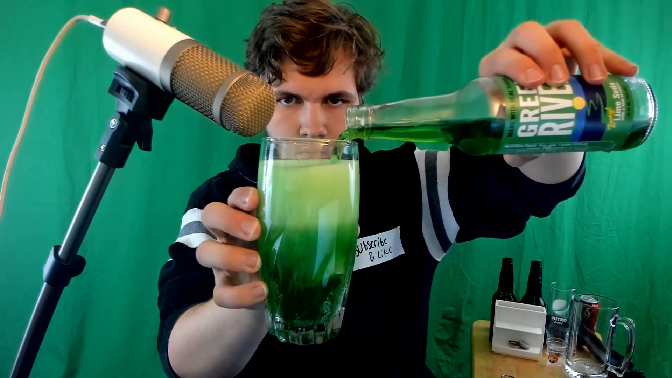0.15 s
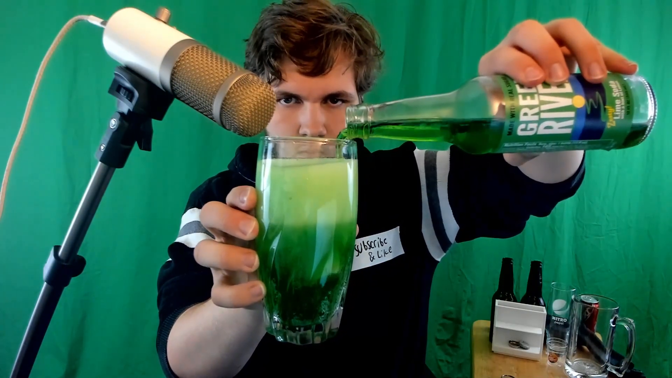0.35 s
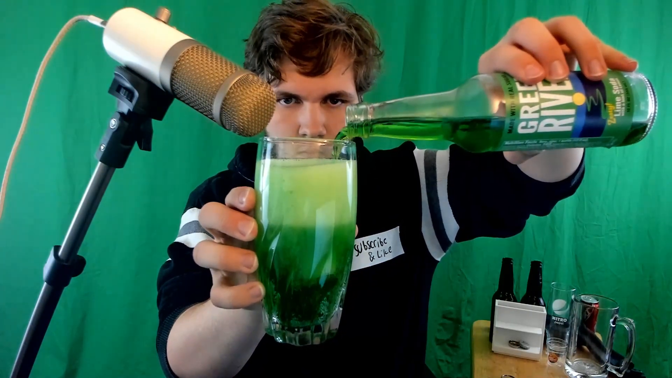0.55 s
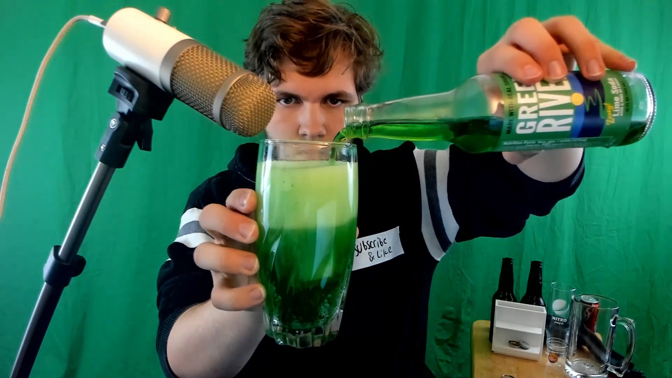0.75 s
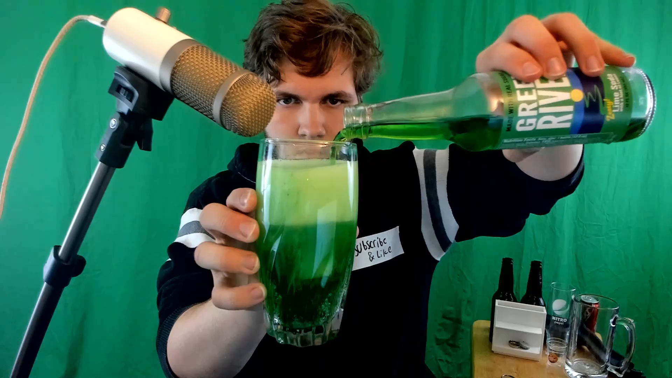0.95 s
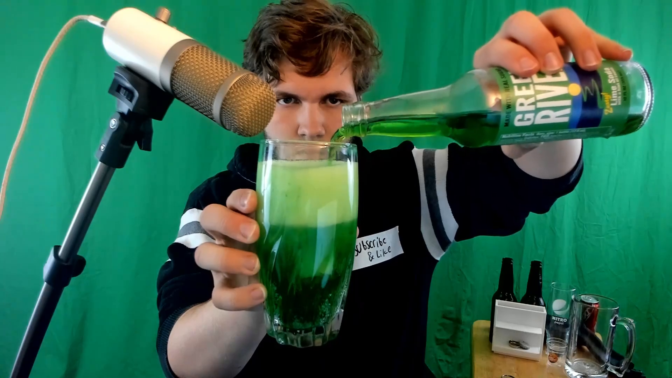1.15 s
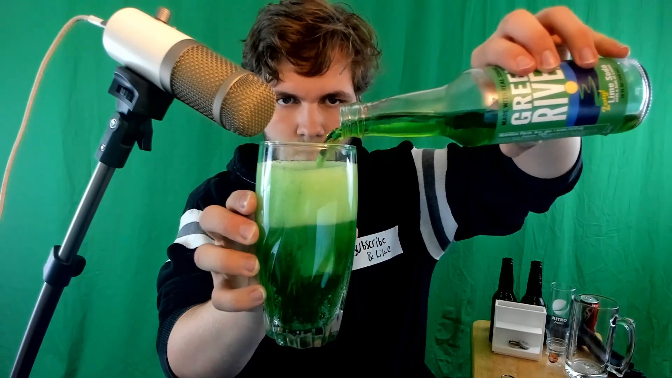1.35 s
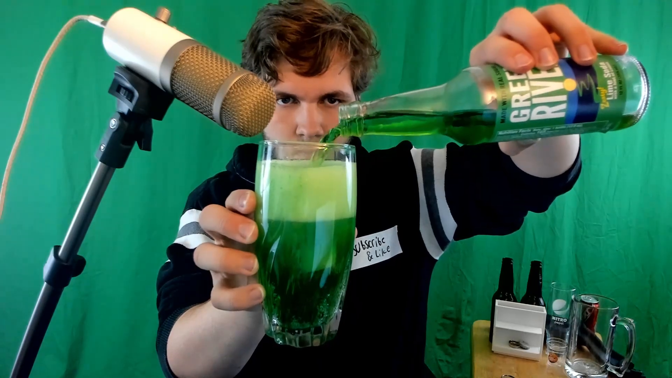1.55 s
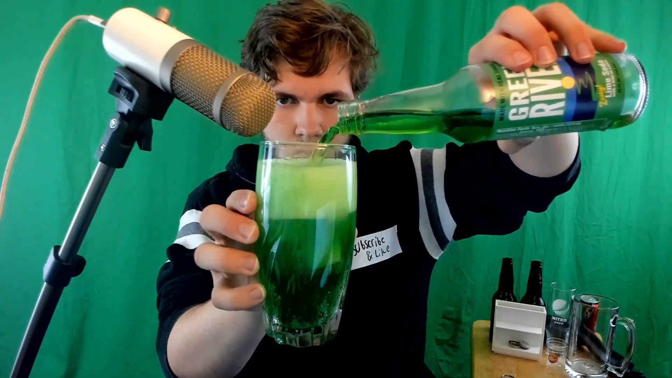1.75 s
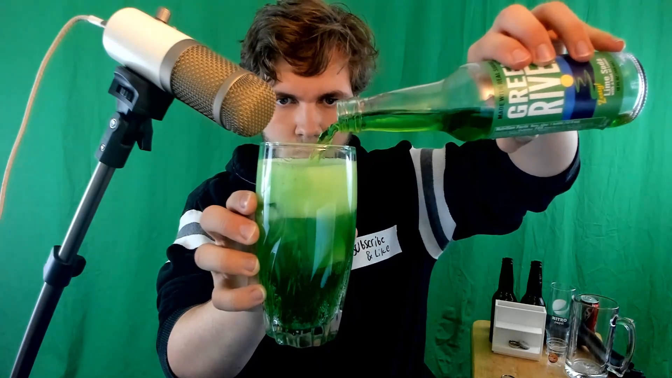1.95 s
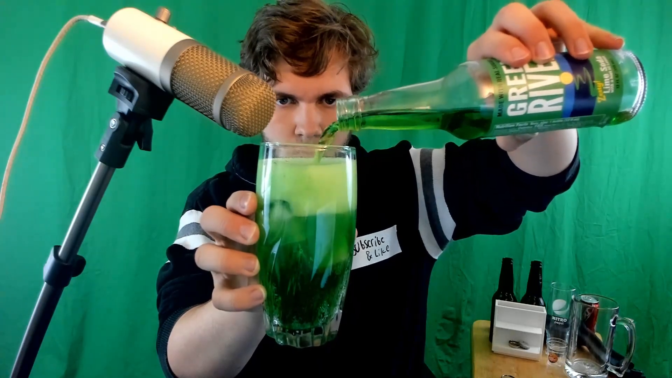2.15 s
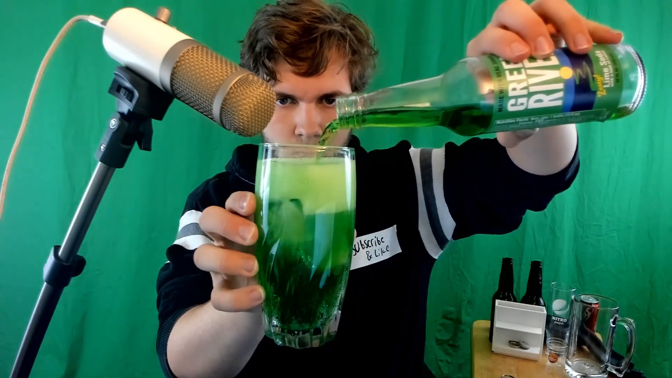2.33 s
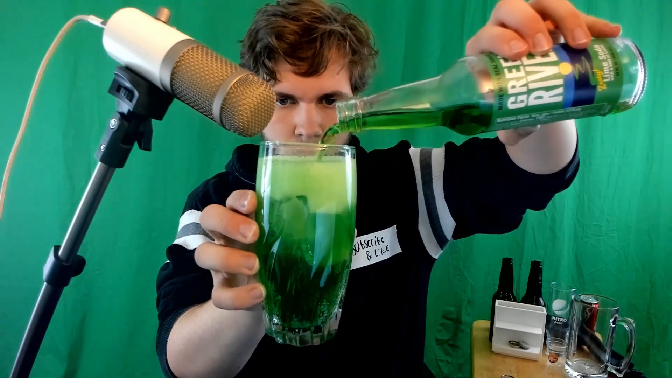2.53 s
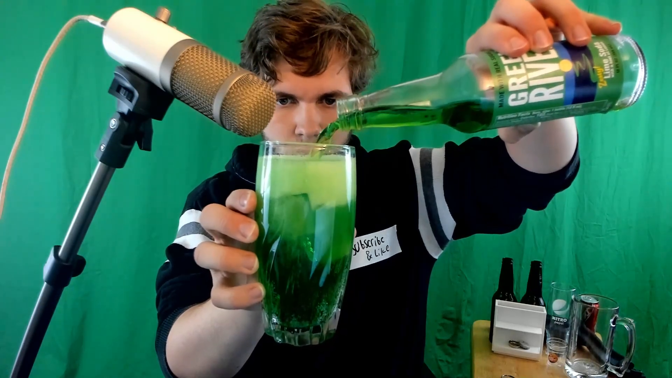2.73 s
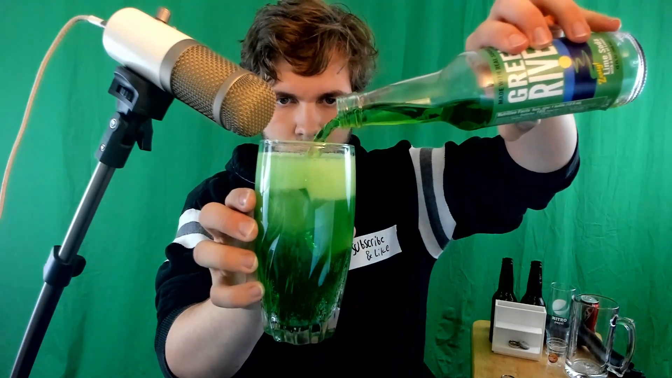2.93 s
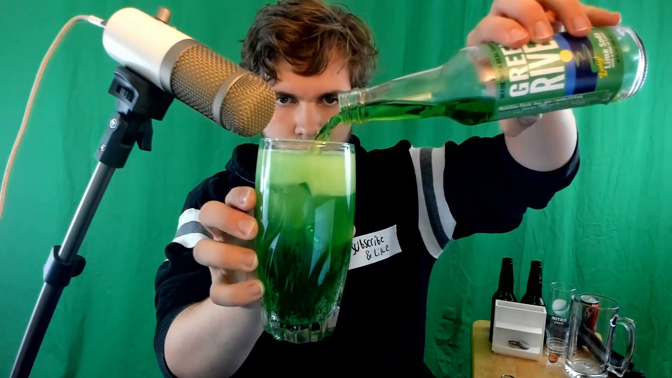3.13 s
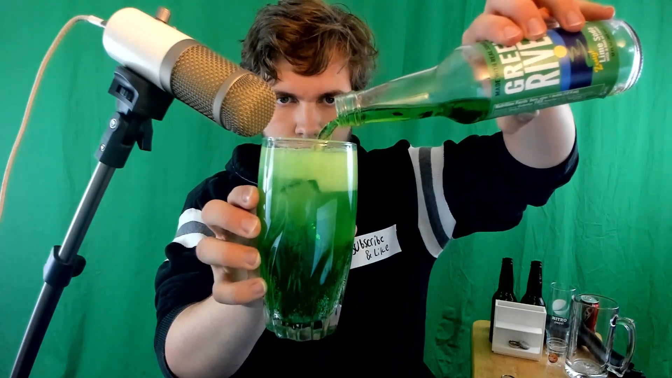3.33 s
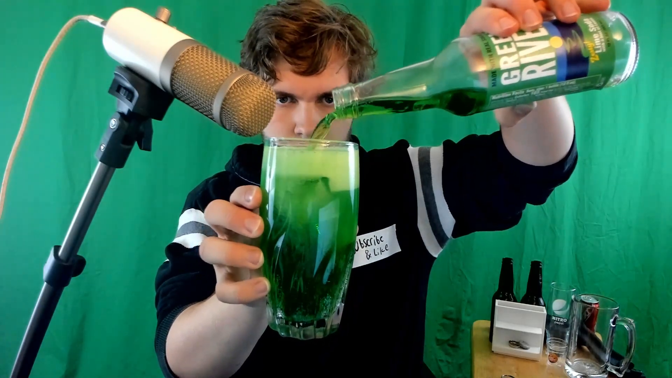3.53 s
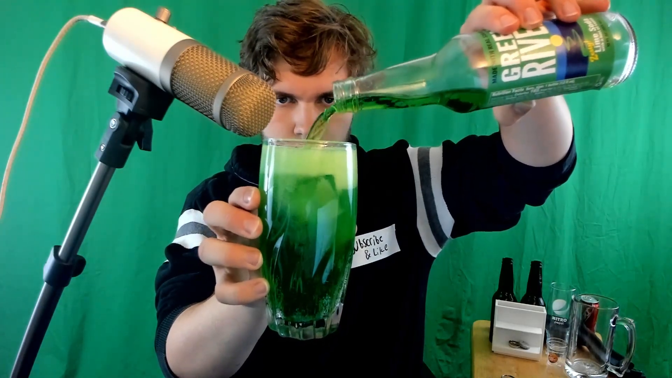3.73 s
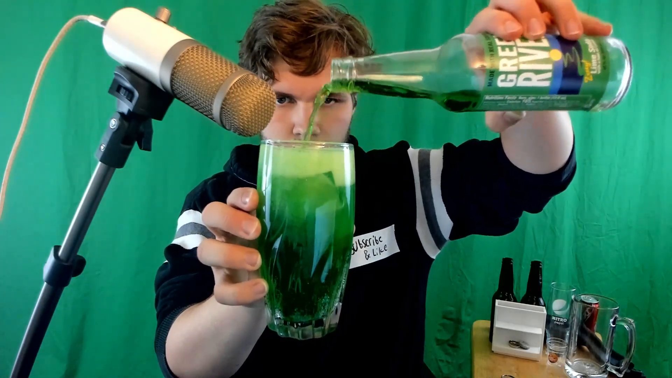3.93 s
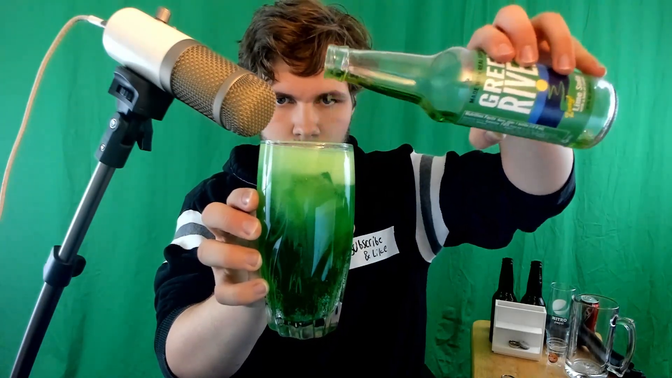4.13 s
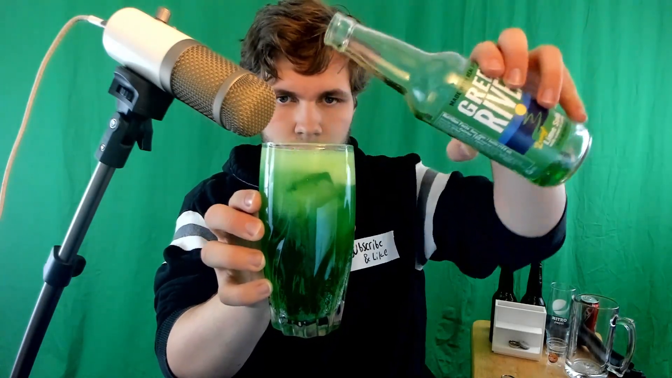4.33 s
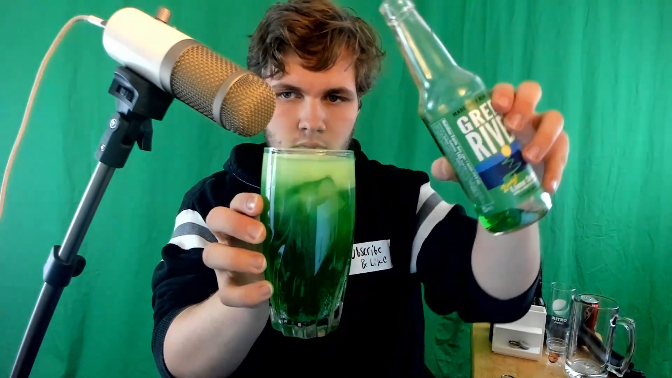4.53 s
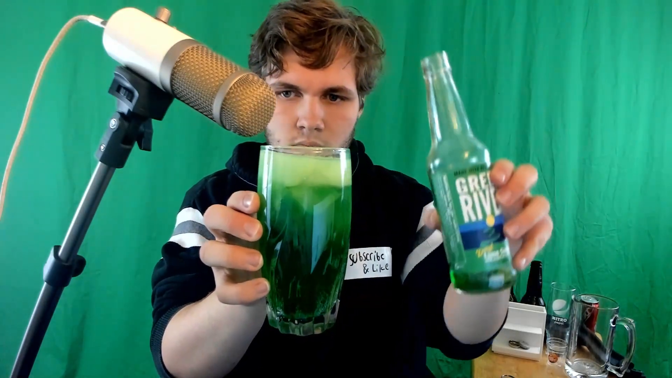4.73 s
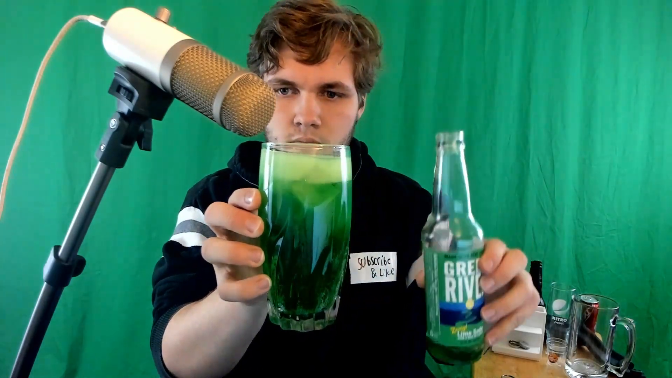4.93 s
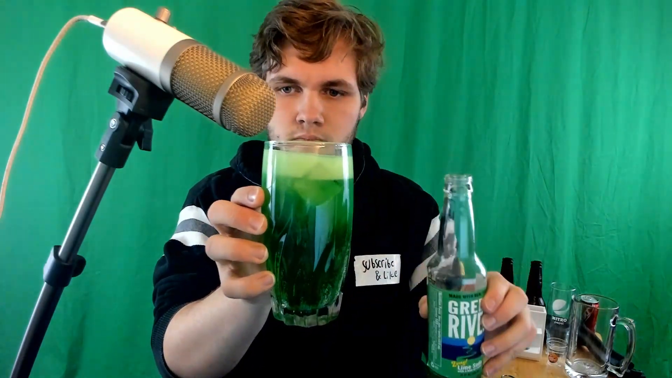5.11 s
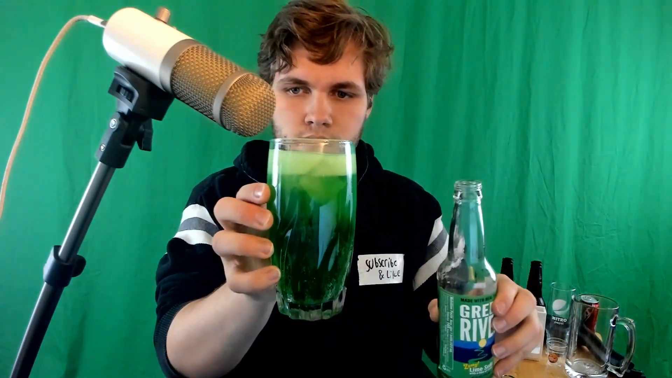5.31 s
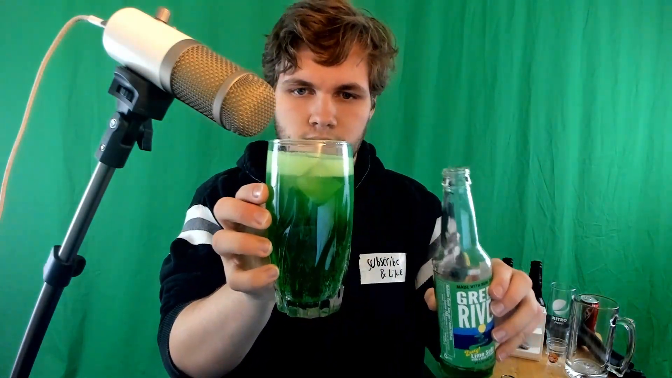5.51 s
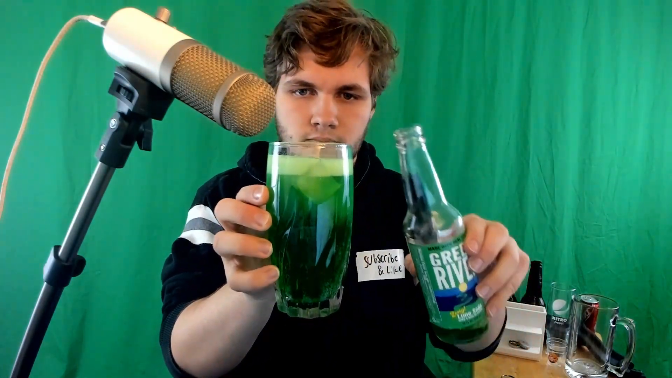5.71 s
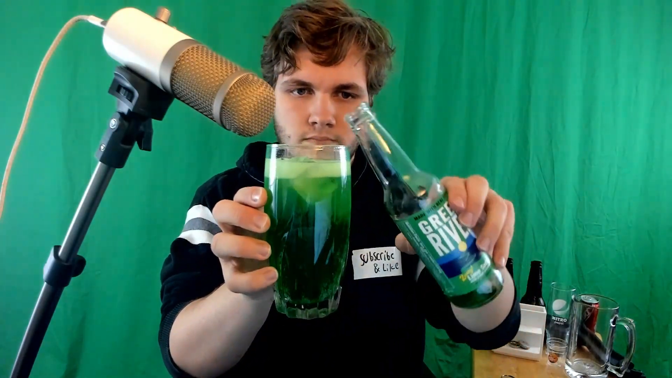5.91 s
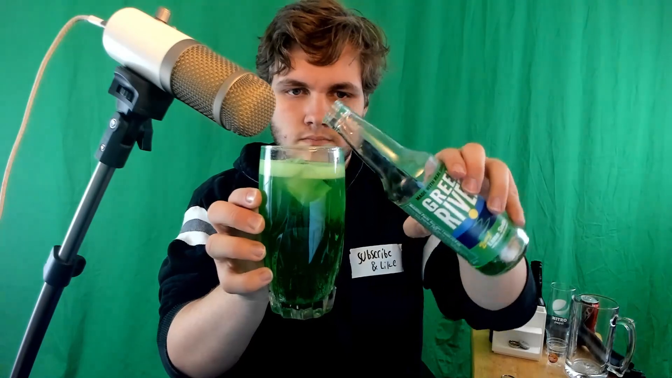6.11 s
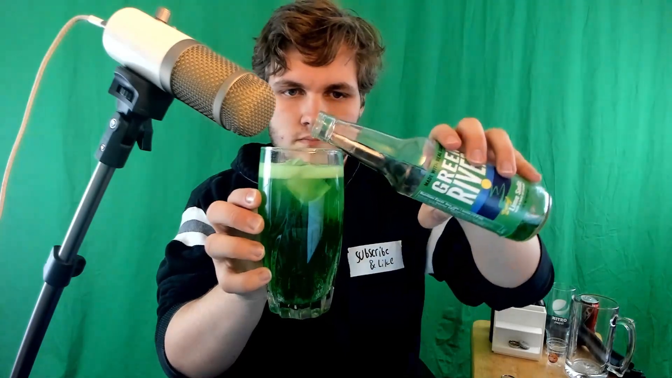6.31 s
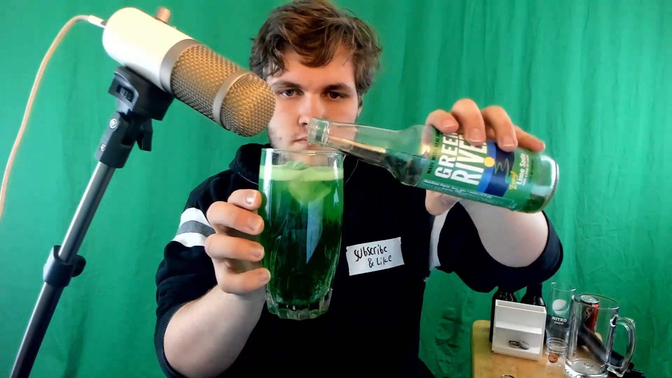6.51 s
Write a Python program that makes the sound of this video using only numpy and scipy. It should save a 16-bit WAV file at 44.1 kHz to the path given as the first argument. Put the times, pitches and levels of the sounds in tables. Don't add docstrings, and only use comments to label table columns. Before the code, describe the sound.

Fresh carbonated drink hisses and crackles tightly under a close microphone. Ice cubes snap early, slightly left; soft low sloshes and stand bumps sit beneath. A short bright surge follows, then the stream runs over bare ice. When pouring stops, the hiss falls in small uneven spurts of bubbles until only weak sizzle remains over soft room air and a faint low fan.

```python
import sys
import numpy as np
from scipy import signal
from scipy.fft import rfft, irfft, next_fast_len
from scipy.io import wavfile
from scipy.ndimage import uniform_filter1d, map_coordinates

SR = 44100
rng = np.random.default_rng(int(sys.argv[2]) if len(sys.argv) > 2 else 0)


def log_audio(samples):
    frames = np.atleast_2d(samples).T
    limited = np.clip(frames, -1, 1)
    pcm = np.round(limited * 32767).astype(np.int16)
    wavfile.write(sys.argv[1], SR, pcm)


def to_linear_factor(level_db):
    exponent = np.asarray(level_db, float) / 20
    return 10 ** exponent


N = 293706

# f/Hz, width/Hz, level/dB
MOUTH_THIN = [(1777, 146, 3), (2910, 63, 6.5), (3040, 240, -10), (8400, 250, -9)]


def unit(x):
    return x / np.sqrt(np.mean(x ** 2) + 1e-20)


def along(points, hz):
    f, v = np.transpose(points)
    return np.interp(np.log(hz + 1), np.log(f + 1), v)


def curves(rows):
    s, *cols = np.transpose(rows)
    return [np.interp(np.arange(N) / SR, s, c) for c in cols]


def wobble(rate):
    knots = rng.standard_normal(int(N * rate / SR) + 4)
    return map_coordinates(knots, [np.arange(N) * rate / SR])


def hump(s, length):
    return np.exp(-((np.arange(N) / SR - s) / length) ** 2)


def settled():
    return np.clip((np.arange(N) / SR - 3.68) / 1.6, 0, 1)


def filtered(x, response):
    m = next_fast_len(N + 8192)
    return irfft(rfft(x, m) * response(np.fft.rfftfreq(m, 1 / SR)), m)[..., :N]


def cavity(modes, f):
    gain = 1
    for hz, width, db in modes:
        off = hz * hz - f * f
        gain = gain * (off + 1j * f * width * to_linear_factor(db)) / (off + 1j * f * width)
    return gain


def smooth_field(shape, bands, frames):
    field = uniform_filter1d(rng.standard_normal(shape), size=bands, axis=0)
    return unit(uniform_filter1d(field, size=frames, axis=1))


def bursts(spectrum, modes, spread_db, patchy_db):
    pops = rng.standard_normal(N) * to_linear_factor(spread_db * rng.exponential(size=N))
    z = signal.stft(pops, nperseg=256)[2]
    clumped = z * to_linear_factor(patchy_db * smooth_field(z.shape, 12, 8))
    pops = signal.istft(clumped, nperseg=256)[1][:N]
    return unit(filtered(pops, lambda f: to_linear_factor(along(spectrum, f)) * cavity(modes, f)))


def bubbling():
    # t/s, level/dB
    foam_level = [(0, -30), (.7, -29), (1.4, -29), (1.52, -28), (1.9, -28), (2.06, -30.5), (2.3, -29),
                  (3.11, -29.5), (3.26, -31.5), (3.75, -34), (4.1, -35), (4.3, -37), (4.9, -38),
                  (5.35, -37.5), (5.6, -40.5), (5.9, -43.5), (6.3, -46.5), (6.66, -47.5)]
    # t/s, length/s, lift/dB, extra sparkle/dB
    crowds = [(0.09, 0.033, -1.5, 5), (0.164, .05, 0.5, 1.5), (.45, 0.11, 0, 5), (1.816, 0.027, 1.86, -7),
              (3.49, 0.16, 0.5, 0), (3.84, 0.058, 2.5, 2), (3.97, 0.031, 2.5, -2), (4.072, 0.066, 1.5, 4),
              (4.493, 0.055, 3.5, 1), (4.7, 0.063, 4.5, 1), (4.94, .06, 0.1, 9), (5.344, 0.066, 1, 3.5),
              (5.958, 0.041, 2, 11), (6.106, 0.046, 1, 1), (6.61, 0.051, 3, 4)]
    shapes = [hump(s, length) for s, length, *_ in crowds]
    lift_db, sparkle_db = np.transpose(crowds)[2:] @ shapes
    return curves(foam_level)[0] + lift_db, sparkle_db + .6 * wobble(12)


def surface():
    # t/s, share of thick foam/0-1, share of stream on bare ice/0-1
    pour = [(0, 0.99, 0.11), (.8, 0.89, 0.05), (1.6, 0.89, .13), (1.8, 0.86, 0.12), (2.13, 0.57, .05),
            (2.3, 0.32, 0.55), (2.9, 0.25, 0.7), (3.1, 0, 0.57), (3.3, 0, 0.24), (4.3, 0, 0),
            (6, 0.04, 0.01), (6.66, 0.15, 0.05)]
    thick, bare = np.clip(curves(pour), 0, 1)
    return thick, bare, np.clip(1 - thick - bare, 0, 1)


def foam(thick, thin):
    # f/Hz, level/dB per Hz
    thick_bubbles = [(300, -34), (600, -32), (1250, -29), (1600, -24.5), (2500, -27.5), (3300, -19),
                     (3900, -2), (4500, 2.5), (5500, -4.5), (6900, -8.5), (8300, -23), (9400, -16.5),
                     (10600, -19), (12500, -37)]
    # f/Hz, level/dB per Hz
    thin_bubbles = [(300, -41), (600, -23), (1400, -22.5), (1750, -20.5), (2350, -28), (3300, -16),
                    (3900, 2), (4600, 4), (5200, -1.5), (6700, -15.5), (8000, -22), (8900, -18.5),
                    (10500, -26), (12000, -75)]
    # f/Hz, width/Hz, level/dB
    mouth_thick = [(1680, 150, 4), (2825, 75, 11), (3120, 450, -13)]
    dense = bursts(thick_bubbles, mouth_thick, spread_db=0.65, patchy_db=0.1)
    sparse = bursts(thin_bubbles, MOUTH_THIN, spread_db=0, patchy_db=0.02)
    return np.sqrt(thick) * dense + np.sqrt(thin) * sparse


def stream_on_ice(bare):
    # f/Hz, level/dB per Hz
    stream_bubbles = [(300, -32), (600, -23.5), (1300, -23.5), (1700, -18.5), (2500, -21.5), (3400, -23.5),
                      (3900, 0), (4500, 5.5), (5200, 1), (7000, -6.5), (8300, -7), (9500, -15.5),
                      (10500, -18), (12000, -42)]
    return np.sqrt(bare) * bursts(stream_bubbles, MOUTH_THIN[:3], spread_db=0, patchy_db=0.6)


def spray(thick, bare, thin, fizz_db, sparkle_db):
    # f/Hz, level/dB per Hz
    thick_mist = [(9000, -8.5), (10600, 0.5), (12000, 3.5), (13500, -2.5), (14500, -14), (15700, -25)]
    # f/Hz, level/dB per Hz
    thin_mist = [(9500, -28), (10800, 4), (11800, 0), (12700, -1), (13500, 6), (14300, -2), (15700, -12)]
    age = np.arange(N) / SR
    level_db = fizz_db + 0.57 * sparkle_db - 39 + 14 * thick + 4 * bare + 8 * settled()
    level_db = level_db + 9 * np.exp(-age / 1.47)
    level_db = level_db - 4 * np.clip(age - 5.4, 0, None)
    mist = np.sqrt(1 - thin) * bursts(thick_mist, [], spread_db=1.2, patchy_db=.9)
    mist = mist + np.sqrt(thin) * bursts(thin_mist, [], spread_db=1, patchy_db=.6)
    return to_linear_factor(level_db) * mist


def glass_air(crackle, thick, bare, surge, sparkle_db):
    # t/s, f/Hz, strength/dB
    main_ring = [(0, 4730, 6), (.25, 4620, 3.5), (.45, 4530, 5), (.9, 4500, 5), (1.6, 4430, 7.5),
                 (1.87, 4190, 5.5), (2, 4440, 6.5), (2.95, 4460, 7.5), (3.15, 4330, 7.5), (3.45, 4480, 7),
                 (3.7, 4330, 8), (4.15, 4090, 4.5), (4.9, 4300, 5), (5.5, 4290, 4.5), (5.95, 4470, 7),
                 (6.08, 4250, 8), (6.25, 4130, 7), (6.66, 4270, 7)]
    f, t, z = signal.stft(crackle, SR, nperseg=512)
    at = np.clip((t * SR).astype(int), 0, N - 1)
    main_hz, main_db = np.array(curves(main_ring))[:, at]
    still = settled()[at]
    thick, bare, surge, sparkle_db = thick[at], bare[at], surge[at], sparkle_db[at]
    upper_hz = 8240 * (1 + 0.11 * thick + 0.061 * still)
    upper_db = 5.5 + 2 * thick - 6 * bare + 6 * still + 0.39 * sparkle_db
    first_hz = 7410 * (1 + .036 * thick)
    second_hz = 10050 * (1 - .025 * still)
    high_db = 6 * hump(3.6, 0.51)[at] - 9 * still
    neck = hump(6.43, 0.15)[at]
    neck_hz = 4820 * (1 - .04 * (1 - neck))
    calm = np.clip(1.1 - bare - .8 * surge, 0, 1)
    rings = [
        (main_hz, 180, main_db - 4 * neck), (main_hz - 330, 250, -4),
        (upper_hz, 900, upper_db), (13500, 800, high_db),
        (first_hz, 480, -18 * calm ** 3),
        (second_hz, 500, -8 - 8 * calm ** 2), (second_hz + 650, 500, 6 * still),
        (neck_hz, 200, 10 * neck), (4820 - 400, 300, -5 * neck)]
    z = z * to_linear_factor(1.78 * smooth_field(z.shape, 2, 80))
    return signal.istft(z * abs(cavity(rings, f[:, None])), SR, nperseg=512)[1][:N]


def fizz():
    fizz_db, sparkle_db = bubbling()
    thick, bare, thin = surface()
    surge = hump(1.8, .08)
    body = foam(thick, thin) + stream_on_ice(bare) + splash(surge)
    crackle = to_linear_factor(fizz_db - 2) * body + spray(thick, bare, thin, fizz_db, sparkle_db)
    ringing = glass_air(crackle, thick, bare, surge, sparkle_db)
    return to_linear_factor(0.46 * wobble(14) + 0.12 * wobble(45)) * ringing


def fan():
    # f/Hz, level/dB
    lines = [(55, -66), (120, -71.5), (215, -76.5), (258.4, -68.5), (344.5, -72.5), (375, -84), (410, -80)]
    hum = np.zeros(N)
    for hz, db in lines:
        turns = np.cumsum(hz + 0.86 * wobble(5.4)) / SR
        hum += to_linear_factor(db + 1.5 + 0.38 * wobble(3.06)) * np.sin(2 * np.pi * turns)
    return hum


def room_air():
    # f/Hz, level/dB per Hz
    air_spectrum = [(15, -16), (60, -0.5), (150, -3.5), (420, -7), (500, -17), (1500, -24), (6000, -30),
                    (15500, -37)]
    return to_linear_factor(-63) * unit(filtered(rng.standard_normal(N), lambda f: to_linear_factor(along(air_spectrum, f))))


def stand_rumble():
    # t/s, length/s, level/dB
    jolts = [(.5, .3, -58), (.85, .2, -59.5), (1.1, .08, -61), (1.4, 0.17, -61), (1.65, .09, -48),
             (1.8, .1, -58), (2.02, 0.036, -54), (2.42, .12, -58), (2.82, .1, -57), (3.06, 0.084, -54.5),
             (3.55, .2, -68), (4.72, .08, -67), (4.95, .1, -68), (5.45, .08, -66), (5.72, 0.13, -62)]
    spectrum = [(8, -13), (20, -3), (45, -6), (75, -23.5), (200, -65)]  # f/Hz, level/dB per Hz
    low = unit(filtered(rng.standard_normal(N), lambda f: to_linear_factor(along(spectrum, f))))
    shake = to_linear_factor(-68 - 3 * settled())
    for s, length, db in jolts:
        shake = shake + to_linear_factor(db - 6) * hump(s, length)
    return shake * low


def loose_bands(stereo):
    # t/s, low edge f/Hz
    flips = [(.035, 10300), (.165, 8300), (.17, 13450), (.38, 9800), (.475, 9700), (.475, 11000),
             (.52, 9700), (.52, 12800), (.595, 8100), (.595, 11900), (.785, 8900), (.87, 10300),
             (1.055, 11100), (1.13, 11900), (1.21, 9200), (1.79, 12300), (1.89, 12300), (1.96, 10350),
             (2.09, 8500), (2.105, 12000), (2.2, 10800), (2.45, 10350), (2.745, 9600), (3.065, 8900),
             (3.43, 8900), (4.15, 9650), (4.47, 8900), (4.81, 8900), (5.22, 8900), (5.43, 8900)]
    f, t, z = signal.stft(stereo, SR, nperseg=256)
    s, low_hz = np.transpose(flips)
    band = (f[:, None] > low_hz) & (f[:, None] < low_hz + 900)
    fade = np.cos(np.pi / 2 * np.clip((t - s[:, None]) / .027, -1, 1)) ** 2
    apart = np.clip(band @ fade, 0, 1)
    other = np.roll(z[0], 40, axis=1)
    z = z * (1 - .9 * apart) + .95 * apart * np.array([other, -other])
    return signal.istft(z, SR, nperseg=256)[1][:, :N]


def lean_left(mono):
    # start t/s, end t/s, lean/dB, width/dB, top f/Hz
    leans = [(0.362, 0.388, -15, -22, 14000), (0.413, 0.477, -20, -14, 7600),
             (0.502, 0.563, -15, -20, 8400), (0.852, 0.905, -15, -17, 8000),
             (0.931, 0.985, -14.5, -22, 13000), (1.844, 1.863, -16, -8, 3350)]
    t = np.arange(N) / SR
    echo = signal.fftconvolve(mono, rng.standard_normal(300) / np.sqrt(300))[:N]
    side = np.zeros(N)
    for a, b, lean_db, wide_db, top_hz in leans:
        moved = ((t > a) & (t < b)) * (to_linear_factor(lean_db) * mono + to_linear_factor(wide_db) * echo)
        side += filtered(moved, lambda f: (f < top_hz) * f / (f + 45))
    return side


def slosh():
    # t/s, f/Hz, length/s, level/dB
    gulps = [(.37, 130, 0.18, -58.5), (0.66, 108, .2, -69), (0.937, 205.2, 0.24, -59.5),
             (1.74, 100, 0.26, -58.5), (4.95, 129.6, 0.12, -64), (1.2, 324, 0.12, -67),
             (1.847, 130, 0.071, -61), (5.4, 74, 0.58, -62.5)]
    out = np.zeros(N)
    for s, hz, length, db in gulps:
        noise = rng.standard_normal(N)
        tone = unit(filtered(noise, lambda f: cavity([(hz, 0.47 * hz, 40)], f) - 1))
        out += to_linear_factor(db) * hump(s, length / 2) * tone
    return out


def ice():
    # t/s, peak level/dB
    cube_knocks = [(0.3774, -32.5), (0.379, -35), (0.412, -33), (0.51, -38), (.512, -39), (0.514, -37),
                   (.52, -35), (0.535, -37), (0.546, -39.5), (1.848, -33.5)]
    # t/s, peak level/dB
    ice_cracks = [(.3793, -25), (.5337, -26), (.5377, -19.5), (.5466, -22)]
    cracks, knocks = np.zeros(N + SR), np.zeros(N + SR)
    t = np.arange(SR // 100) / SR
    snap = np.exp(-(t / .00016 - 2.5) ** 2) * np.sin(2 * np.pi * 4800 * t)
    for s, db in ice_cracks:
        cracks[round(s * SR):][:len(t)] += to_linear_factor(db) * snap
    for s, db in cube_knocks:
        puff = rng.standard_normal(len(t))
        knocks[round(s * SR):][:len(t)] += to_linear_factor(db + 1 - 60 * t / 0.016) * puff
    return cracks[:N] + filtered(knocks[:N], lambda f: 1 / (1 + 1j * f / 1800))


def splash(surge):
    # f/Hz, level/dB per Hz
    splash_spectrum = [(3000, -40), (4500, -10), (5500, 4), (6400, 8), (7800, 0), (8600, -18), (10000, -42)]
    return to_linear_factor(-3) * surge * bursts(splash_spectrum, [], spread_db=1, patchy_db=1)


def scene():
    clinks = ice()
    mono = fizz() + fan() + room_air() + stand_rumble() + slosh() + clinks
    early = np.arange(N) / SR < 2
    side = .5 * clinks * early + lean_left(mono)
    return np.array([mono + side, mono - side])


def top_cut(x):
    return signal.sosfilt(signal.butter(12, 15710, fs=SR, output="sos"), x)


def record(dry):
    mix = filtered(loose_bands(dry), lambda hz: hz < 15720)
    return top_cut(mix)


dry = scene()
out = record(dry)
log_audio(out)
```